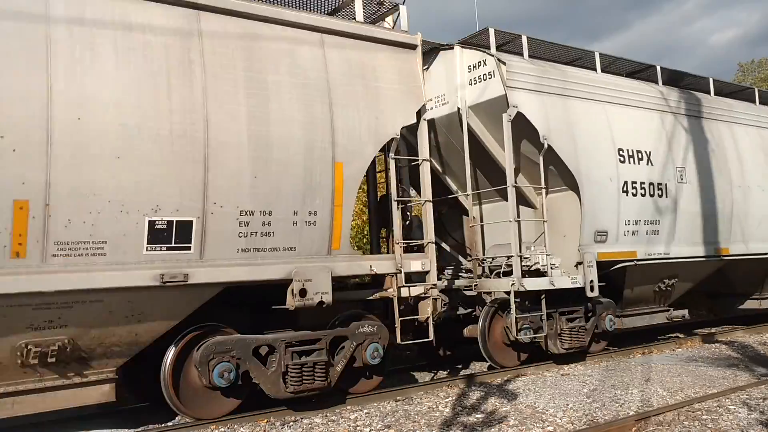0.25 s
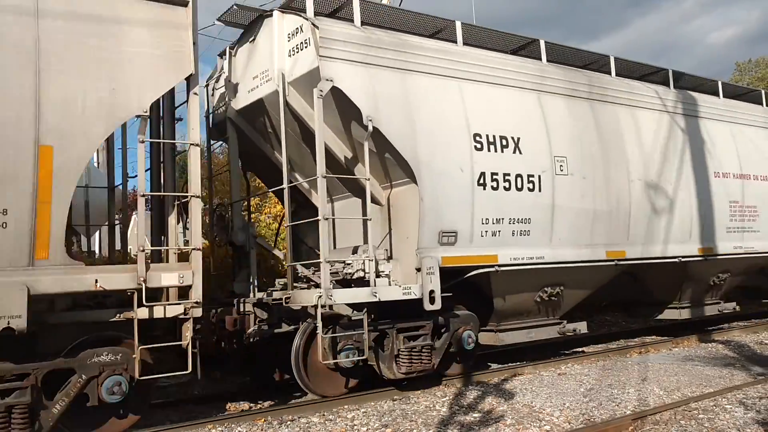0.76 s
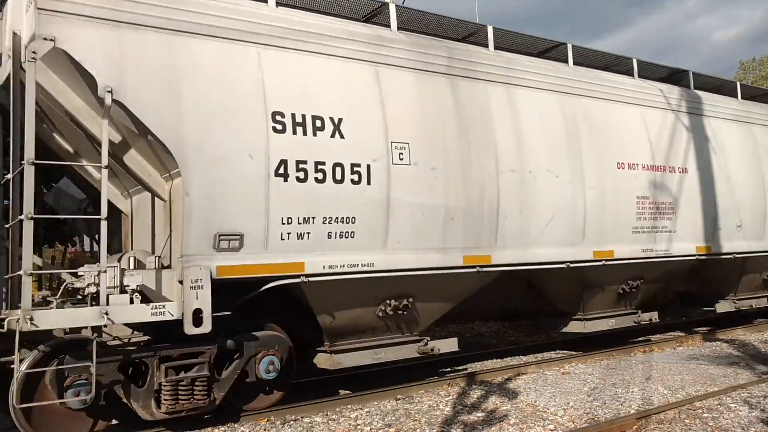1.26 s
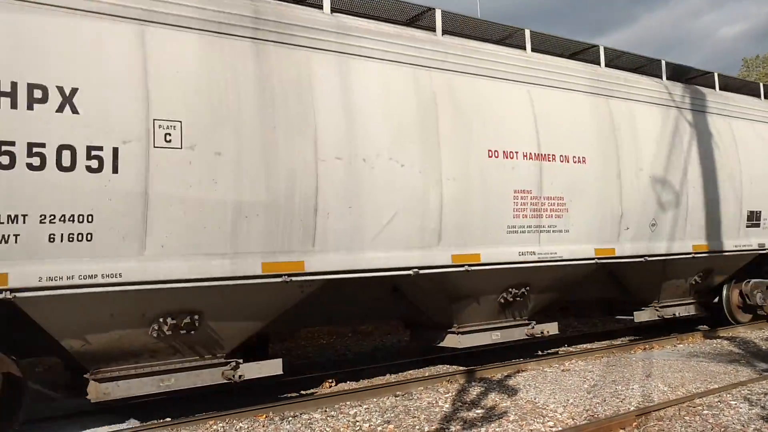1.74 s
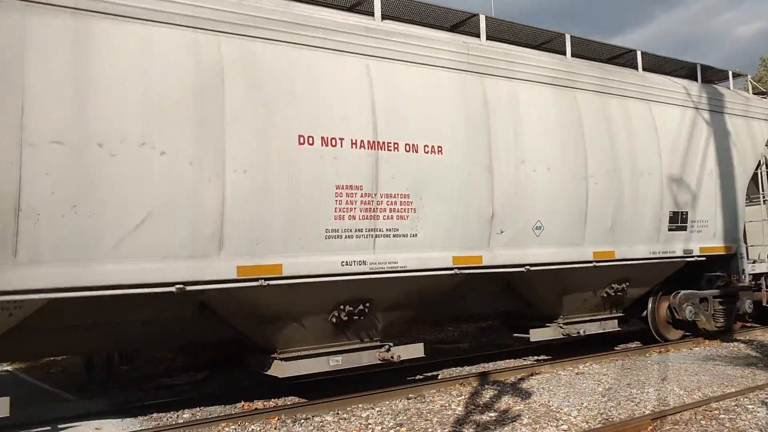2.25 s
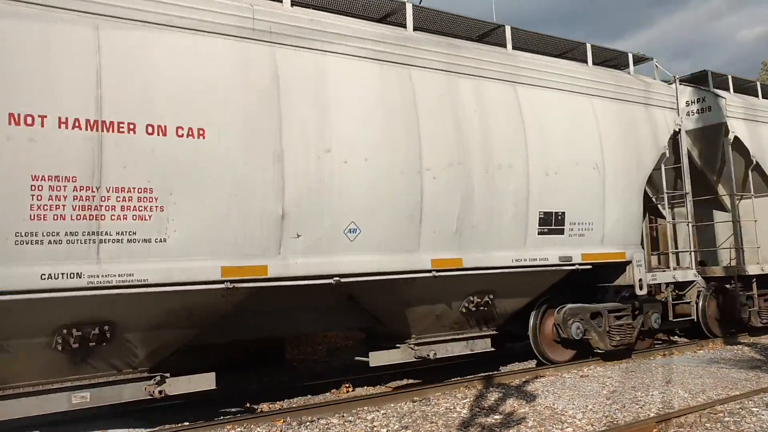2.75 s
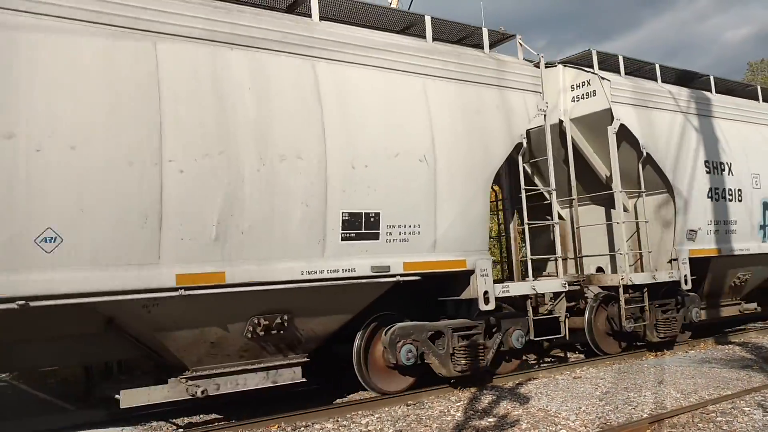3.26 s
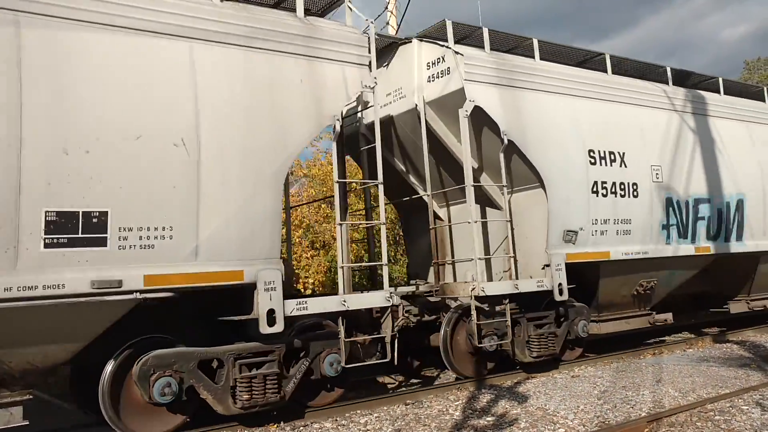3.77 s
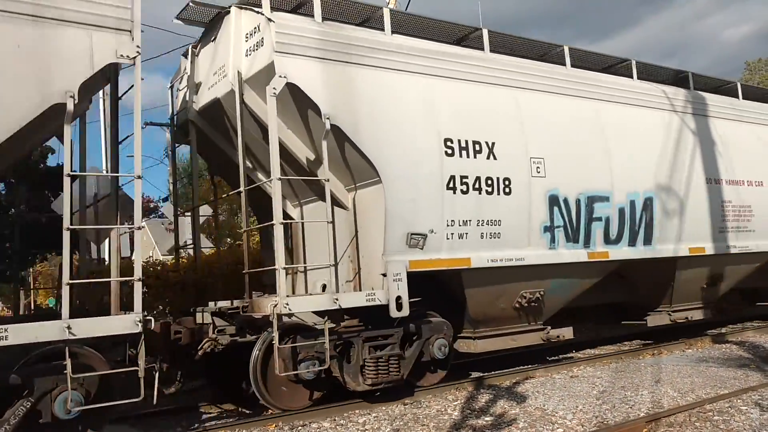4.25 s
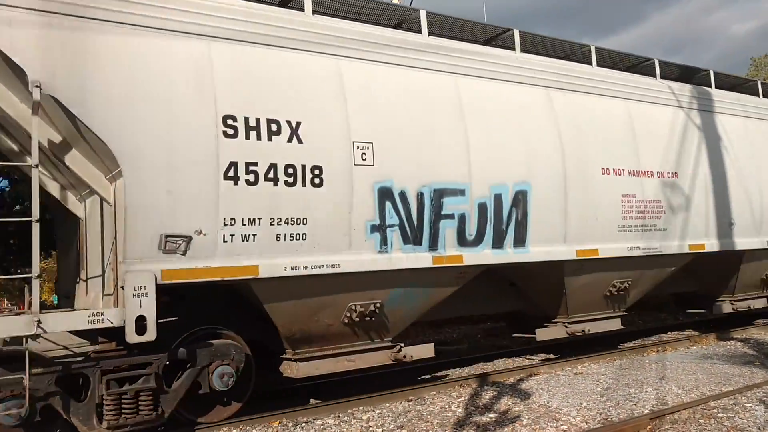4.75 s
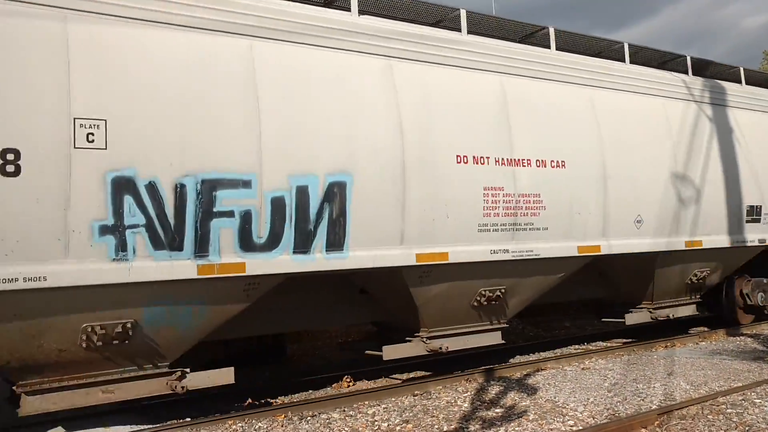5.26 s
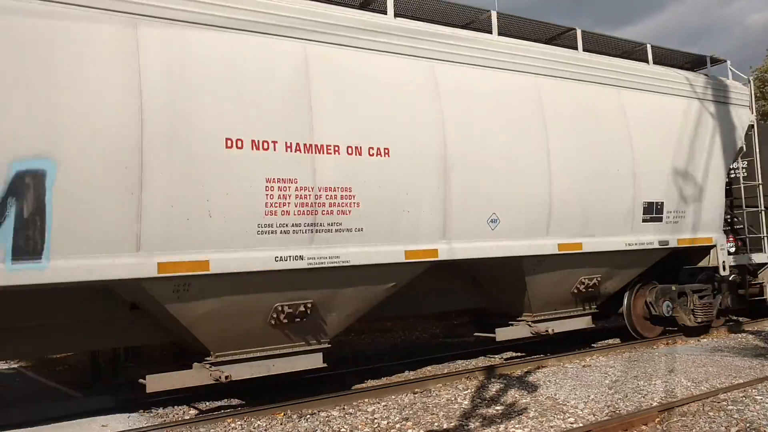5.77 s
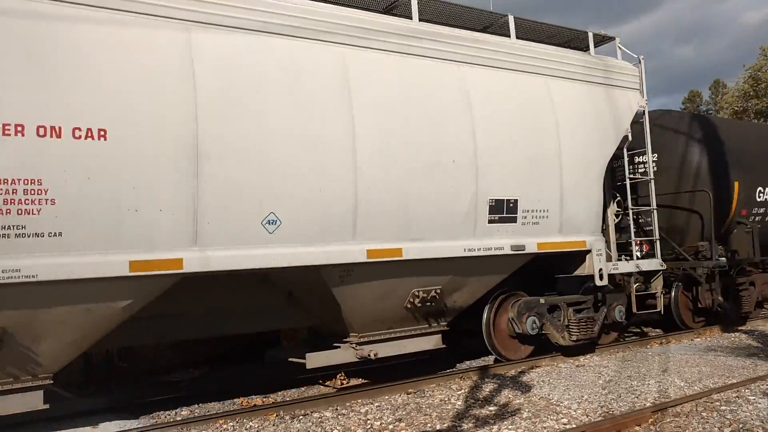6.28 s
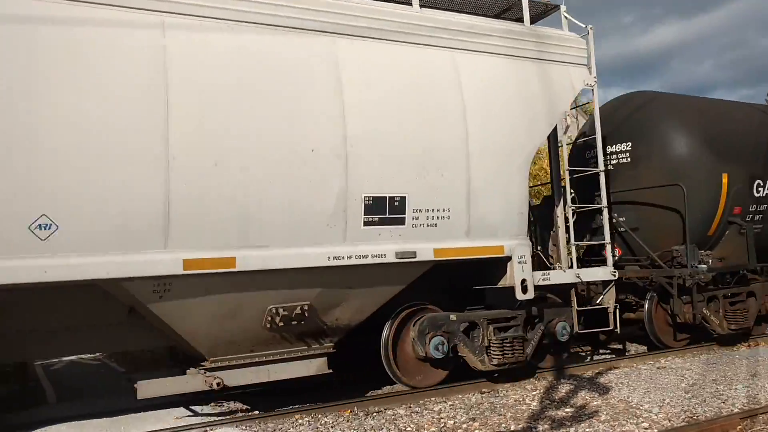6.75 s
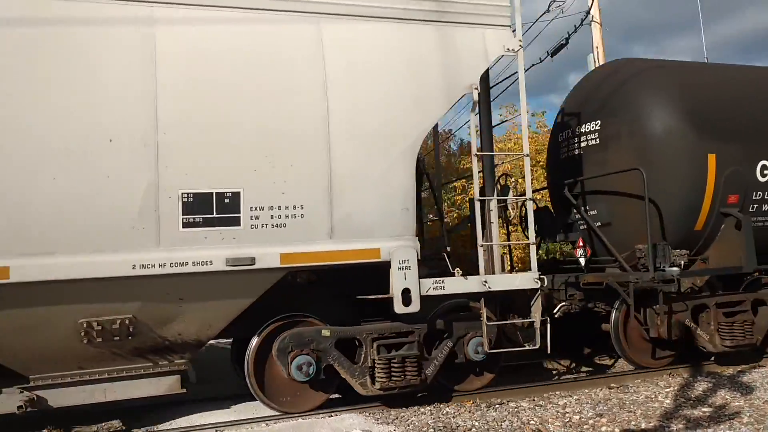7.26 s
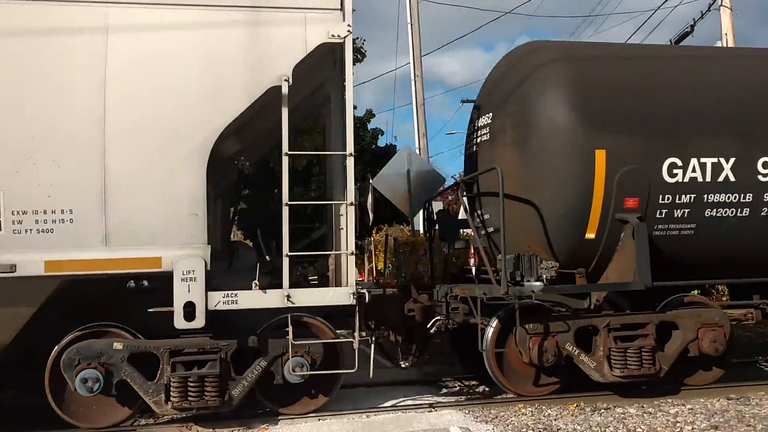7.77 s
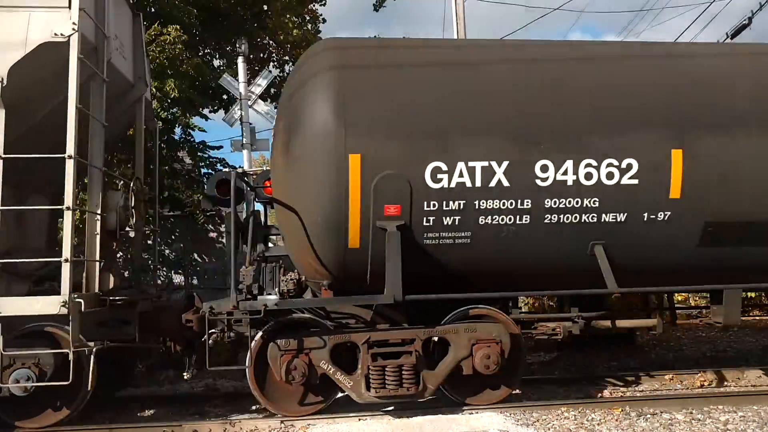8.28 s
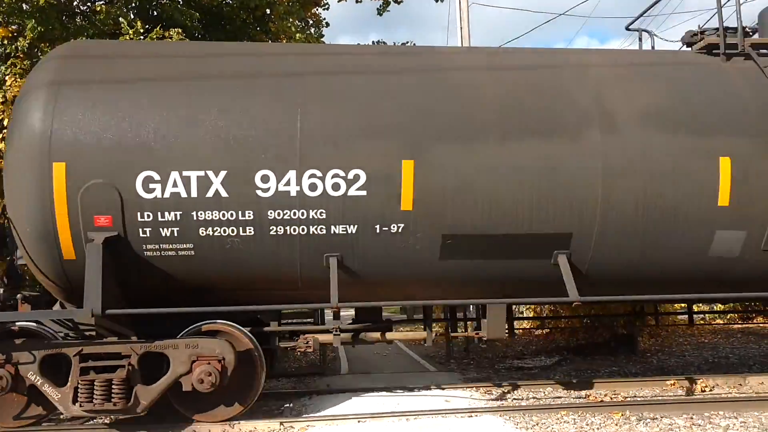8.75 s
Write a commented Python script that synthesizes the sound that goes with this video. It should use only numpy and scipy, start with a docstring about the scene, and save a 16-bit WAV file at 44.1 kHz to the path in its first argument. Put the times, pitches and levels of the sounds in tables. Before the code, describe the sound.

Outdoor trackside sound, close and wide in stereo. Steel wheels roll steadily throughout, a rough rumble beneath grainy, tinkling hiss. Uneven runs of hard metallic clacks and duller thuds come as each group of axles crosses the rail joints, the struck wheels ringing thinly afterward. Small rattles, knocks and high chirps fill the gaps, and grinding briefly swells twice before the train continues past.

```python
"""Beside a railway line: freight cars roll past a few metres away, droning, rumbling, roaring and hissing (shaped noise).
The four axles at each coupling bang over three rail gaps in turn (noise bursts and knocks), and the struck wheels
ring on (fading tones). Loose steel knocks, rattles and chirps, faint tones give the hiss a tinkling grain, and two
trucks scrape past with a grinding sound. A phone hears it through two ports and sharpens its stereo by taking a
delayed copy of each port from the other."""
import sys
import numpy as np
from scipy import signal
from scipy.fft import rfft, irfft, next_fast_len
from scipy.io import wavfile
from scipy.ndimage import uniform_filter1d, map_coordinates

SR = 44100
rng = np.random.default_rng(int(sys.argv[2]) if len(sys.argv) > 2 else 0)


def generate_wav(sig):
    """Save sig (samples, or channels by samples) to the path in sys.argv[1] as 16-bit PCM at SR."""
    pcm = np.round(np.clip(np.atleast_2d(sig).T, -1, 1) * 32767).astype(np.int16)
    wavfile.write(sys.argv[1], SR, pcm)


N = 397782  # length in samples, about 9 s

# Axles crossing rail gaps: start_s, share of the usual ring time, extra high knock_db, gap name, base level_db,
# brighter_db, heavier_db, rise_s, base fade by 60 dB_s, then pitch_hz and level_db of three main wheel tones
AXLE_BLOWS = [(0.1513, 0.84, 4.6, "second", -14, -2.5, 1.5, 0.0089, 0.15, 3380, -43, 3820, -53, 3940, -48),
              (0.6031, .7, 3, "second", -14, -3.5, 3, 0.016, 0.083, 3300, -41, 3850, -47, 3970, -40),
              (0.9112, 0.93, 0.1, "third", -9.5, -5, 1, 0.024, 0.12, 3360, -37, 3860, -33, 3980, -33),
              (1.2404, 1.3, 0.1, "third", -9.5, 2, -2, 0.0042, 0.1, 3310, -33.5, 3790, -33, 3920, -32.5),
              (1.692, 1.1, 0.1, "third", -10.5, 0.5, 2.5, 0.0056, 0.088, 3330, -43, 3910, -44, 4050, -40),
              (2.019, 0.6, 0.1, "third", -12.5, 1, 2.5, 0.0031, 0.12, 3360, -34.5, 3820, -30.5, 4027, -48),
              (2.137, 0.83, 3, "first", -14.5, 0.5, 6.5, 0.0019, 0.13, 3270, -53, 3800, -50, 4080, -41),
              (2.463, .7, 0.1, "first", -14.5, 1.5, 1.5, 0.0033, 0.12, 3330, -49, 3780, -54, 4000, -58),
              (2.8879, 0.61, 3, "first", -11, 3, -9, 0.0098, 0.15, 3330, -41, 3780, -46, 3970, -55),
              (3.2219, .7, 0.1, "second", -10.5, -4.5, 1.5, 0.0064, 0.11, 3390, -57, 3800, -56, 3953, -56),
              (3.552, 0.93, 3, "second", -16.5, -3.5, 2, 0.012, 0.2, 3330, -52, 3940, -52, 4090, -38),
              (3.976, .7, 1.7, "second", -16.5, -4, 5.5, 0.0046, 0.16, 3350, -54, 3910, -33, 3970, -36),
              (4.316, 0.93, 0.1, "third", -13, 2, 4, 0.0069, 0.14, 3240, -41, 3838, -38, 4040, -48),
              (4.6453, 0.7, 0.1, "third", -12.5, -1, 0, 0.0059, 0.17, 3400, -54, 3860, -50, 3970, -35),
              (5.071, 1.06, 0.1, "third", -10, 0, 0.5, 0.0072, 0.067, 3280, -40.5, 3810, -49, 3980, -37),
              (5.4009, 0.66, 0.1, "third", -11, 2.5, 1.5, 0.0034, 0.12, 3295, -33.5, 3870, -30, 3900, -33.5),
              (5.5168, 0.9, 1.5, "first", -14, 2, 4.5, 0.0026, 0.093, 3291, -37.5, 3797, -50, 3920, -50),
              (5.8412, .7, 1.5, "first", -12, 3, 2, 0.018, 0.077, 3280, -61, 3876, -62, 3955, -62),
              (6.28, .7, 3.3, "first", -11, 2.5, -2, 0.014, 0.099, 3420, -51, 3850, -59, 3930, -63),
              (6.608, .7, 1.5, "second", -11, -3.5, 2.5, 0.01, 0.087, 3300, -62, 3920, -58, 3900, -57),
              (6.9349, 0.59, 0.1, "second", -13, -3.5, -0.5, 0.011, 0.088, 3324, -48, 3800, -47, 3960, -51),
              (7.3726, 0.63, 1.5, "second", -14, -6, 6, 0.0049, 0.073, 3290, -42, 3860, -54, 4037, -52),
              (7.703, 0.8, 4, "third", -9, -5.5, -3, 0.0071, 0.11, 3334, -42, 3887, -55, 3950, -63),
              (8.031, 0.96, 4, "third", -10.5, -6.5, -3.5, 0.003, 0.11, 3250, -58, 3850, -53, 3980, -38),
              (8.4682, 0.43, 8, "third", -13.5, -6.5, 4, 0.0078, 0.13, 3420, -41, 3846, -50, 3931, -51),
              (8.7991, .7, 8.6, "third", -11.5, -5.5, -2, 0.0025, 0.075, 3460, -51, 3870, -58, 4020, -60),
              (8.963, 0.63, 5, "first", -17, -4, 3.5, 0.0017, .09, 3240, -43, 3810, -40, 3900, -47)]
# Car bodies: time_s, base drone level_db, base rumble level_db
CAR_BODIES = [(0, -29, -32.5), (.6, -27, -31), (1.0, -33, -33), (1.5, -35, -33.5), (2.05, -31, -32.5),
              (2.7, -32.5, -32.5), (3.3, -30, -32.5), (3.85, -28, -33), (4.5, -32.5, -36),
              (5.199, -34.5, -30.5), (6.0, -35, -33), (6.5, -31.5, -34), (7.2, -32, -33), (7.7, -35, -31),
              (8.25, -40, -34.5), (9.02, -34.5, -33.5)]
# Tone colour of the wheel hiss: pitch_hz, relative level_db per Hz
HISS_SPECTRUM = [(1200, -4), (2200, 3.5), (2450, -22), (2750, 3.5), (3400, -0.5), (4500, -2.5), (4750, 3.5),
                 (5300, -2.5), (6500, -3), (8600, -1.5), (9500, -6), (11000, -11), (12500, -17),
                 (15000, -21)]


def amp(db):
    """Turn a level in dB into a gain."""
    return 10 ** (np.asarray(db) / 20)


def unit(x):
    """Scale x to an rms (average strength) of 1."""
    return x / np.sqrt(np.mean(x ** 2))


def even(x):
    """Hold the level of x steady over about 20 ms."""
    power = np.abs(uniform_filter1d(np.mean(x ** 2, axis=0), size=900))
    return x / np.sqrt(power + 1e-9)


def along(points, hz, order=1):
    """Read one column of a table at the given pitches, on a log pitch axis."""
    columns = np.transpose(points)
    return np.interp(np.log(hz + 1), np.log(columns[0] + 1), columns[order])


def wobble(rate):
    """Draw a smooth random curve through `rate` random points a second."""
    points = rng.standard_normal(int(N * rate / SR) + 4)
    return map_coordinates(points, [np.arange(N) * rate / SR])


def grid():
    """Give a fast Fourier transform length and its frequencies in Hz."""
    m = next_fast_len(N + 8192)
    return m, np.fft.rfftfreq(m, 1 / SR)


def rush(spectrum, patchy_db):
    """Make two unrelated noises of joint rms 1 that share random patches of louder and softer sound."""
    z = signal.stft(rng.standard_normal((2, N)), nperseg=512)[2]
    patches = uniform_filter1d(rng.standard_normal(z.shape[1:]), size=4, axis=0)
    patches = uniform_filter1d(patches, size=6, axis=1)
    pair = signal.istft(z * amp(patchy_db * unit(patches)), nperseg=512)[1][:, :N]
    m, hz = grid()
    closed = [(10, -120), *spectrum, (SR / 2, -120)]
    return unit(irfft(rfft(pair, m) * amp(along(closed, hz)), m)[:, :N])


def add_tones(out, s, hz, db, rise, t60, draw, beat=.61, sag=0, rough=0):
    """Add fading, beating tones at s seconds; each port's tone sways in phase by itself, evening out the level."""
    rough_rate, rough_db, rough_rad = 45, 2.5, .35  # ringing steel wavers in level and phase, each tone by itself
    sag_s = .05  # a tone starts high by the share `sag` and settles in about this time
    t = np.arange(round(SR * min(np.max(t60), .44))) / SR
    gain = amp(db - 60 * t / t60) * (1 - np.exp(-t / rise))
    gain = gain * np.clip((t[-1] - t) / 0.025, 0, 1)  # a short fade closes the tone
    gain = gain * (1 + beat * np.cos(2 * np.pi * hz * 0.00516 * draw[0] * t + 10 * draw[1]))
    knots = rough * rng.standard_normal((2, len(draw[0]), 30))
    level, phase = [[np.interp(t * rough_rate, np.arange(30), row) for row in rows] for rows in knots]
    gain = gain * amp(rough_db * np.array(level))
    steady_turn = 2 * np.pi * hz * (t + sag * sag_s * (1 - np.exp(-t / sag_s)))
    ports = []
    for port_draw in draw[2:4]:
        sway = .8 * np.sin(2 * np.pi * (7 + 2 * port_draw) * t + 7 * port_draw)
        turn = rough_rad * np.array(phase) + 10 * port_draw + sway
        ports.append(np.sum(gain * np.sin(steady_turn + turn), axis=0))
    out[:, round(s * SR):][:, :len(t)] += ports


def sprinkle(when, t, gain, hz, turns):
    """Place many short tones at chance times, each with its own starting phase at each port."""
    at = ((when * N).astype(int) + np.arange(len(t))).ravel()
    tones = [gain * np.sin(2 * np.pi * (hz * t + turn)) for turn in turns]
    return np.array([np.bincount(at, tone.ravel(), N + len(t))[:N] for tone in tones])


def levels():
    """Base rumble, roar, hiss and grinding in dB: rumble follows roar; scrapes add to all and alone grind."""
    # Rolling noise, loud near the trucks and low under the middle of a car: time_s, roar_db, hiss_db
    rolling_levels = [(0.0, -29.5, -35), (0.45, -32.5, -39), (0.85, -30.5, -33.5), (1.4, -36, -39),
                      (2.001, -34.5, -39.5), (2.449, -36.5, -40), (2.62, -41.5, -47), (2.86, -36, -44),
                      (3.2, -30.5, -35.5), (3.6, -29, -35.5), (3.94, -27.5, -40), (4.6, -33.5, -39),
                      (5.3, -35.5, -41.5), (5.73, -32.5, -37), (5.92, -38, -46.5), (6.12, -36, -43.5),
                      (6.35, -30.5, -39.5), (6.9, -26, -31), (7.1, -27.5, -38.5), (7.8, -30, -37),
                      (8.27, -33.5, -41), (8.72, -29.5, -39), (9.02, -38.5, -41)]
    # Trucks scraping past: start_s, length_s before the final fade, rumble_db, roar_db, hiss_db, grinding_db
    scrapes = [(3.96, 0.35, -35, -25.5, -25, -32), (7.233, 0.4, -29.5, -27.5, -28.5, -27)]
    swell_s, cut_s = 0.25, 0.092  # a scrape builds slowly and stops short
    rumble_grows = 0.64  # dB of rumble for each dB of roar
    t = np.arange(N) / SR
    time_s, roar, hiss = np.transpose(rolling_levels)
    roar_db, hiss_db = np.interp(t, time_s, roar), np.interp(t, time_s, hiss)
    rumble_db = np.interp(t, *np.transpose(CAR_BODIES)[::2]) + rumble_grows * (roar_db - roar_db.mean())
    no_grind_db = np.full(N, -np.inf)
    power = amp([rumble_db, roar_db, hiss_db, no_grind_db]) ** 2
    for start, length, *db in scrapes:
        building, stopping = (t - start) / swell_s, (start + length + cut_s - t) / cut_s
        shape = np.clip(np.minimum(building, stopping), 0, 1)
        power = power + (amp(db)[:, None] * shape) ** 2
    return 10 * np.log10(power + 1e-12)


def rolling():
    """Rough steel on steel: car bodies drone and rumble, rails roar, contact patches hiss, wheels sing faintly."""
    # Tone colours of drone, rumble, roar and grinding: pitch_hz, relative level_db per Hz
    drone_spectrum = [(22, -22), (45, -8.5), (70, -3), (130, -3.5), (200, -5.5), (350, -43)]
    rumble_spectrum = [(70, -21), (150, -0.5), (250, -0.5), (350, -3), (450, -11), (700, -12), (1200, -47)]
    roar_spectrum = [(200, -23), (400, -4.5), (600, 1.5), (850, -0.5), (1250, 2.5), (1800, -4.5),
                     (2500, -20), (4000, -32)]
    grind_spectrum = [(250, -25), (345, 3), (480, -18), (700, -30), (1100, -4), (1500, 1), (2000, -11),
                      (2800, -32), (4000, -32)]
    # Faint singing of rolling wheels: pitch_hz, relative level_db
    singing_tones = [(3100, -3), (3320, 0), (3530, -2), (3840, 0), (3965, 0), (4500, -3), (6610, -5),
                     (8740, -5)]
    singing_width_hz, singing_db = 35, -11  # half width of each band; level against the hiss
    rumble_db, roar_db, hiss_db, grind_db = levels()
    shake = wobble(60)  # loose parts shake roar and hiss together
    drone_db = np.interp(np.arange(N) / SR, *np.transpose(CAR_BODIES)[:2])
    drone = amp(drone_db + 1.7 * wobble(4.7)) * rush(drone_spectrum, patchy_db=1.5)
    rumble = amp(rumble_db + 1.8 * wobble(7)) * rush(rumble_spectrum, patchy_db=1.54)
    roar_gain = amp(roar_db - 5.0 + 1.15 * wobble(25) + 0.42 * shake)
    roar = roar_gain * rush(roar_spectrum, patchy_db=1.6)
    # the fastest wobble gives the hiss its fine grain
    hiss_gain = amp(hiss_db + 0.27 * wobble(25) + 1.5 * shake + 0.18 * wobble(400))
    hiss = hiss_gain * rush(HISS_SPECTRUM, patchy_db=2.3)
    grind = amp(grind_db + 1.4 * wobble(140)) * rush(grind_spectrum, patchy_db=0.0)
    bands = [(hz + side * singing_width_hz, db - 20 * abs(side))
             for hz, db in singing_tones for side in (-1, 0, 1)]
    singing = amp(hiss_db + singing_db) * rush([(2000, -60), *bands, (11000, -60)], patchy_db=4)
    return singing + grind + drone + rumble + roar + hiss


def rattle(count=12000):
    """Loose steel ticks densely all along the trucks, a few cycles at a time, following the roar."""
    middle_hz, spread_octaves, cycles = 900, .8, 1.6
    level_db, spread_db = -5, 3  # level against the roar; unevenness of the ticks
    when, size, left, right = rng.random((count, 4)).T[..., None]
    hz = middle_hz * 2 ** np.clip(spread_octaves * rng.standard_normal((count, 1)), -1.5, 1.5)
    t = np.arange(SR // 150) / SR
    gain = amp(-spread_db * np.log(size + 0.0053)) * np.exp(-t * hz / cycles) * (1 - np.exp(-t * hz))
    ticks = sprinkle(when, t, gain, hz, (left, right))
    return amp(levels()[1] + level_db) * unit(ticks)


def tinkle(count=400):
    """Many short, faint high tones at chance times give the hiss a tinkling grain, following its level."""
    when, pitch, life, size, left, right = rng.random((count, 6)).T[..., None]
    t = np.arange(SR // 7) / SR
    hz = 1700 * 6.5 ** pitch
    hiss_db = levels()[2][(when * N).astype(int)]
    db = hiss_db - 5.5 + along(HISS_SPECTRUM, hz) - 3 * np.log(size + .08)
    gain = amp(db - 60 * t / (0.077 + 0.35 * life)) * (1 - np.exp(-t / 0.0073))
    return sprinkle(when, t, gain, hz, (left, right))


def bangs():
    """Blows shake rail and truck: lumpy bursts and solid knocks, with a weaker tail sent back by cars and ground."""
    # Knocks of loose gear between gaps: start_s, base level_db, brighter_db, heavier_db, rise_s, base fade by 60 dB_s
    loose_knocks = [(0.472, -20, 1, 1.5, 0.015, 0.21), (0.7405, -37, -15.5, -6, 0.025, 0.15),
                    (0.7962, -14, -1, 2, 0.012, 0.1), (0.9699, -18.5, 5.5, -16, 0.033, 0.081),
                    (1.4655, -24.5, 8, 3, 0.012, 0.23), (2.252, -25.5, 9, 1, 0.007, 0.1),
                    (2.3381, -32, 13, 9, 0.011, .11), (3.114, -21.5, 0, -0.5, 0.015, 0.45),
                    (3.44, -20.5, 3.5, -10, 0.015, 0.15), (3.8912, -17.5, 0, 1, 0.016, 0.34),
                    (4.2193, -15, 4, 1.5, .002, 0.13), (4.875, -28, 5.5, -20, 0.022, 0.37),
                    (5.282, -32, 10, 13.5, 0.0099, 0.33), (6.5389, -26, -3.5, 9, 0.0016, 0.18),
                    (6.863, -19.5, -2.5, -11, 0.019, 0.33), (7.2772, -19.5, -0.5, -0.5, 0.007, 0.75),
                    (7.6032, -12, 0.5, -5, 0.017, 0.069), (8.2435, -19, 1, -13, 0.0041, 0.26),
                    (8.693, -27, 0, -14, 0.0024, 0.19)]
    # Sound of each place, against the blow's level: thud_db, clank_db, clack_db, hiss_db,
    # low knock pitch_hz, high knock pitch_hz, knock level_db
    places = {"first": (-7.5, 0.5, -21.5, -6.5, 601, 1245, -8.5),
              "second": (-6, -5.5, -5.5, -7.5, 605, 1262.5, -5),
              "third": (-4.5, -11.5, -6.5, -8, 606, 1297, -19),
              "loose": (-3.5, -2, -12, -7, 596, 1229, -14.5)}
    # Tone colours of a blow's four bursts: pitch_hz, relative level_db per Hz
    thud_spectrum = [(150, -4), (350, -10.5), (600, -0.5), (850, -3.5), (1200, -10)]
    clank_spectrum = [(600, -31), (950, 1), (1120, 1), (1280, 0.5), (1480, -2), (1900, -1), (2600, -6)]
    clack_spectrum = [(1500, -81), (2300, 4.5), (3500, 13.5), (4400, 2.5), (5500, -14)]
    burst_hiss_spectrum = [(3500, -4), (5000, 3), (8600, 1), (10000, -4), (12500, -12), (15500, -25)]
    # Fading times of thud, clank, clack and hiss, as shares of the blow's base fading time
    lasting = [1.23, 1.63, 1.7, 2.36]
    knock_scatter = .03  # share by which knock pitches vary
    crack_db, crack_t60_s = -3, .025  # the hard first edge of a blow in the treble
    # a sudden blow starts with a bright snap, weaker the slower the blow rises
    snap_db, snap_t60_s, snap_fades_s = 0, .008, .005
    fast_beat = np.array([8, 1, 1, 1, 1])[:, None, None]  # knocks beat faster than wheel tones
    t = np.arange(SR // 3) / SR
    power, knocks = np.zeros((4, N + len(t))), np.zeros((2, N + len(t)))
    hits = [(row[0], *row[2:9]) for row in AXLE_BLOWS]
    hits += [(s, 0, "loose", *rest) for s, *rest in loose_knocks]
    draws = rng.standard_normal((len(hits), 5, 2, 1))
    for (s, extra_db, place, db, bright_db, heavy_db, rise, t60), draw in zip(hits, draws):
        *colour_db, low_hz, high_hz, knock_db = places[place]
        # a brighter blow trades clank for clack, a heavier one thuds more
        colour_db = colour_db + np.array([heavy_db, -bright_db, bright_db, 0])
        contact_gain = np.array([[.49], [.49], [.4], [.4]])
        first_contact = contact_gain * np.clip(t / 0.00033, 0, 1) / (1 + rise / 0.078)
        load = np.clip(t / max(rise, 1e-4), 0, 1)  # the full load arrives
        life = max(t60, .01) * np.array(lasting)[:, None]
        fade = amp(-60 * np.maximum(t - rise, 0) / life)
        tail = amp(-11.0 - 60 * t / 0.24)
        shape = (first_contact + 0.44 * load) * (fade + tail)
        shape[2:] += load * amp(crack_db - 60 * np.abs(t - rise) / crack_t60_s)
        shape[3] += amp(snap_db - 60 * t / snap_t60_s) / (1 + (rise / snap_fades_s) ** 2)
        power[:, round(s * SR):][:, :len(t)] += (amp(db + colour_db)[:, None] * shape) ** 2
        tone_db = db + knock_db + np.array([[colour_db[0] + 10.5], [1.5 + extra_db]])
        hz = np.array([[low_hz], [high_hz]]) * np.exp(knock_scatter * draw[4])
        add_tones(knocks, s, hz, tone_db, 0.00059 + 0.099 * rise, 1.19 * t60, draw[:4] * fast_beat[:4])
        # the full load strikes the rail again
        add_tones(knocks, s + rise, hz[1:], tone_db[1:] - 3.5, .0006, 0.51 * t60, draw[::-1, :1] * fast_beat)
    lumps = amp(2.2 * wobble(220))  # rebounds a few ms apart
    spectra = (thud_spectrum, clank_spectrum, clack_spectrum, burst_hiss_spectrum)
    colours = [even(lumps * rush(spectrum, patchy_db=1.5)) for spectrum in spectra]
    bursts = sum(np.sqrt(p[:N]) * colour for p, colour in zip(power, colours))
    return amp(-7.0) * (bursts + knocks[:, :N])


def strikes():
    """Wheels hit rail ends hard: a few cycles of the rail end and a lower knock of the truck."""
    # Hard strikes: start_s, base level_db, pitch_hz, base low knock level_db
    strike_table = [(0.153, -9, 1210, -15), (0.606, -5, 1120, -12.5), (0.804, -9, 1170, -26),
                    (0.921, -6, 1190, -15), (1.246, -3, 902, -26), (1.701, -14, 1290, -21),
                    (2.006, -22, 1110, -26), (2.023, -14, 1080, -17), (2.137, -7, 1250, -19),
                    (2.463, -7, 1010, -22), (2.895, -6, 1210, -34), (3.124, -23, 1470, -31),
                    (3.227, -1, 1110, -20), (3.458, -11, 1750, -28), (3.553, -14, 1270, -30),
                    (3.913, -11, 1800, -34), (3.979, -12, 1210, -18), (4.163, -19, 1560, -28),
                    (4.198, -12, 1230, -23), (4.222, -4, 1050, -26), (4.285, -15, 1240, -29),
                    (4.312, -12, 1380, -26), (4.652, -13, 1020, -29), (5.074, -16, 1270, -16),
                    (5.406, -18, 1220, -21), (5.516, -12, 1260, -19), (5.757, -12, 1220, -26),
                    (5.828, -16, 1420, -34), (5.845, -8, 1310, -20), (6.287, -13, 1220, -30),
                    (6.608, -16, 1430, -19), (6.774, -19, 1680, -30), (6.946, -13, 1600, -19),
                    (7.029, -18, 1390, -25), (7.1, -16, 1370, -30), (7.374, -13, 1290, -18),
                    (7.451, -13, 1390, -31), (7.704, -10, 1270, -23), (8.036, -18, 1270, -29),
                    (8.213, -20, 1310, -34), (8.238, -12, 1360, -32), (8.477, -15, 1320, -11),
                    (8.801, -7, 1430, -14), (8.963, -4, 1280, -33)]
    strike_t60_s, strike_rise_s, strike_db = 0.026, 0.00056, -6  # level added to the table's
    low_hz, low_t60_s, low_offset_db = 595, 0.043, -2
    out = np.zeros((2, N + SR // 2))
    draws = rng.standard_normal((len(strike_table), 4, 2, 1))
    for (s, db, hz, low_db), draw in zip(strike_table, draws):
        pitches = np.array([[hz], [low_hz]])
        tone_db = np.array([[db + strike_db], [low_db + low_offset_db]])
        t60 = np.array([[strike_t60_s], [low_t60_s]])
        add_tones(out, s, pitches, tone_db, strike_rise_s, t60, draw, beat=0)
    return out[:, :N]


def wheels():
    """A struck wheel rings on in three main tones and weaker ones around them; loose or rubbing steel chirps."""
    # Lesser wheel tones: base pitch_hz, level_db against the loudest main tone, usual fade by 60 dB_s
    lesser_tones = [(2740, -14, .4), (3100, -11, .9), (3530, -9, .6), (4490, -11, .9), (6610, -12, .9),
                    (8720, -12, .9)]
    # Usual time in which each of the three main tones fades by 60 dB [s]
    main_t60_s = [2.03, 0.76, 0.82]
    # Chirps: start_s, pitch_hz, base level_db, rise_s, fade by 60 dB_s
    chirps = [(1.47, 8700, -26, 0.02, 0.24), (1.47, 3410, -26, .015, 0.19), (2.253, 2990, -32, .008, 0.19),
              (2.253, 3430, -24, .008, 0.15), (2.253, 7760, -32, .008, 0.13),
              (2.325, 3440, -29, 0.014, 0.24), (2.53, 7650, -36, .02, .3), (1.125, 3800, -37, .006, 0.067),
              (3.445, 5286, -33, .01, .35), (5.53, 3090, -38, .03, .6), (5.629, 2980, -31, .02, 0.22),
              (5.632, 3460, -31, .015, 0.22), (5.64, 8750, -32, .04, 0.32), (5.74, 6650, -36, .03, .3),
              (6.62, 10034, -36, .01, .35), (7.4, 7800, -19, .01, 0.065), (7.455, 7900, -22, 0.011, 0.11),
              (7.709, 6837, -37.5, .02, 1), (7.709, 8750, -41, 0.017, 0.82), (8.035, 4430, -38, .01, .6),
              (8.472, 8720, -29, 0.0085, 0.41), (8.74, 8200, -27.5, .01, 0.14),
              (8.975, 6100, -25, .006, 0.087), (8.805, 1840, -24, .008, 0.19),
              (8.805, 2358, -28, .04, 0.37), (8.805, 3600, -34, .01, 0.4), (8.805, 7400, -33, .01, 0.46),
              (8.82, 8800, -33.5, 0.025, 0.72)]
    pitch_scatter, level_scatter_db = .006, 3  # lesser tones differ from wheel to wheel and blow to blow
    lesser_hz, lesser_db, lesser_t60 = np.transpose(lesser_tones)
    usual_t60 = np.r_[main_t60_s, lesser_t60][:, None]
    ring = np.zeros((2, N + SR // 2))
    draws = rng.standard_normal((len(AXLE_BLOWS), 6, len(lesser_tones) + 3, 1))
    for row, draw in zip(AXLE_BLOWS, draws):
        main_hz, main_db = np.reshape(row[9:], (3, 2)).T
        hz = np.r_[main_hz, lesser_hz * (1 + pitch_scatter * draw[5, 3:, 0])]
        db = np.r_[main_db, np.max(main_db) + lesser_db + level_scatter_db * draw[4, 3:, 0]]
        t60 = np.clip(row[1], .2, 2) * usual_t60
        add_tones(ring, row[0] + .003, hz[:, None], db[:, None], .004, t60, draw, beat=0.32, sag=.01, rough=1)
    for row, draw in zip(chirps, rng.standard_normal((len(chirps), 4, 1, 1))):
        add_tones(ring, *row, draw, rough=0.82)
    flutter = amp(1.5 * wobble(60) - 1.5)  # the turning wheels make the tones waver
    # the ringing is kept mostly in the second port, so its level stays steady
    return ring[:, :N] * flutter * amp([[-8], [2]])


def scene():
    """Sound at two ports: alike in the bass, unrelated in the treble, where the phone's body shades one."""
    # The two ports: pitch_hz, likeness (0 to 1), lead of the second port_rad, first minus second level_db
    port_table = [(50, .994, .1, -2.6), (130, .991, .11, -3.1), (220, .987, .15, -2.9), (300, .97, .21, -2),
                  (400, .94, .36, -1.3), (500, .93, .85, -1.7), (600, .93, 1.2, -.6), (700, .89, 1.77, .4),
                  (800, .78, 2.48, 1.8), (900, .67, 3.14, 0), (1000, .45, 3.55, -1.3), (1400, .12, 3.6, 0),
                  (2000, .05, 3.6, -3), (3000, 0, 3.6, -2.8), (4300, 0, 3.6, -5), (5600, 0, 3.6, -4),
                  (7000, 0, 3.6, -7), (8500, 0, 3.6, -7.5), (10300, 0, 3.6, 0)]
    m, hz = grid()
    a, b = rfft(rolling() + bangs() + strikes() + rattle() + wheels() + tinkle(), m)
    alike = np.clip(along(port_table, hz, order=1), 0, 1)
    second = alike * a + np.sqrt(1 - alike ** 2) * b
    second = second * np.exp(1j * along(port_table, hz, order=2))
    shade = amp(along(port_table, hz, order=3) / 2)
    return irfft([a * shade, second / shade], m)[:, :N]


def record(dry):
    """Take the delayed other port from each port, combing sum and difference; soften peaks and cut the top."""
    # Crossing of the ports: pitch_hz, share of the other port taken away, extra lag_turns
    cross_table = [(1600, .99, 0), (2450, 1, .022), (4950, .86, .026), (7600, .5, -.035),
                   (10000, .93, .008)]
    delay_s, top_hz = .000399, 15780
    m, hz = grid()
    ports = rfft(dry, m)
    lag_turns = hz * delay_s + along(cross_table, hz, order=2)
    late = along(cross_table, hz) * np.exp(-2j * np.pi * lag_turns)
    x = irfft(ports - late * ports[::-1], m)
    x = x / (1 + np.abs(x / .95) ** 4) ** (1 / 4)
    return irfft(rfft(x) * (hz < top_hz), m)[:, :N]


dry = scene()
out = record(dry)
generate_wav(out)
```